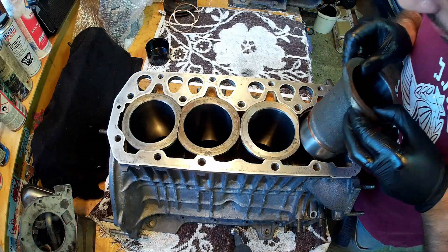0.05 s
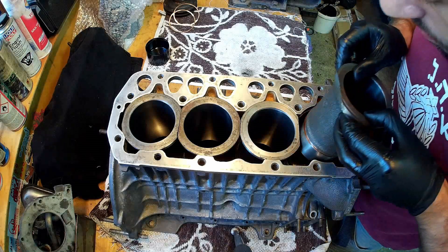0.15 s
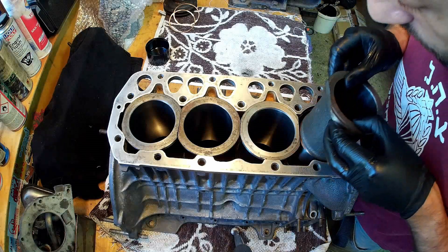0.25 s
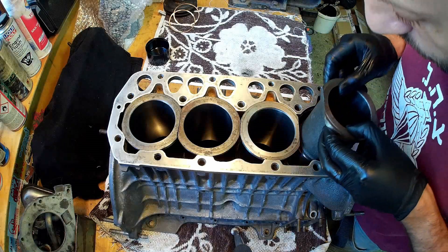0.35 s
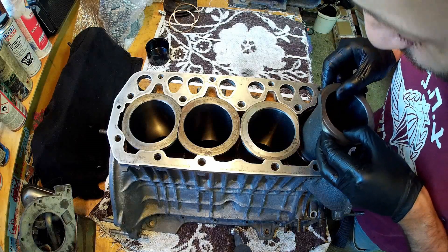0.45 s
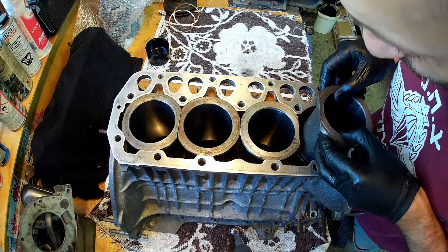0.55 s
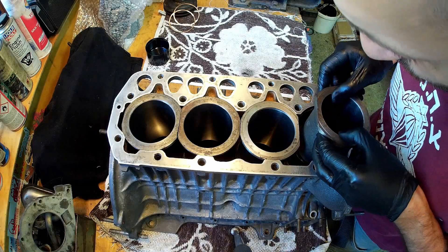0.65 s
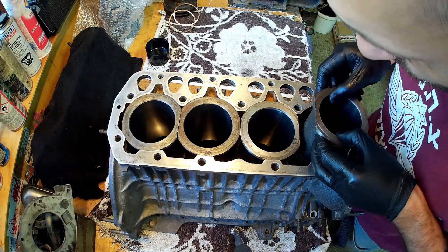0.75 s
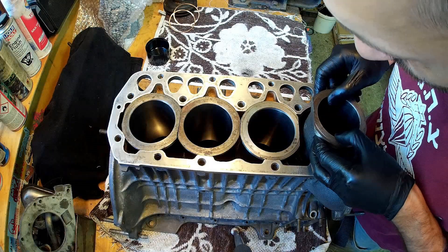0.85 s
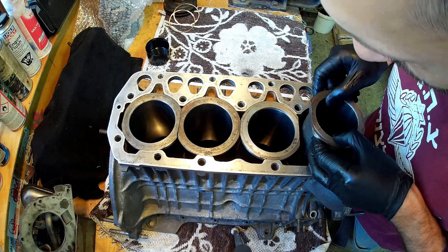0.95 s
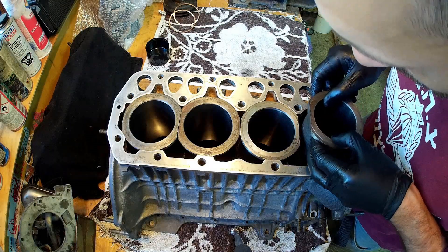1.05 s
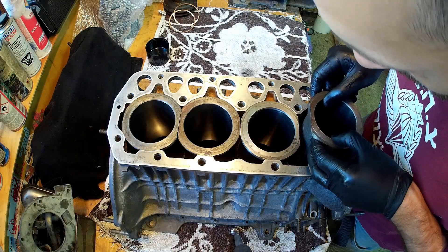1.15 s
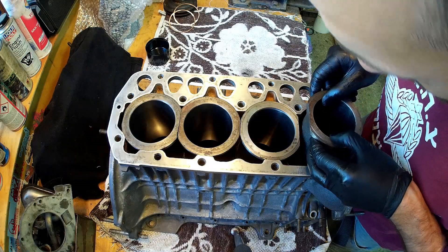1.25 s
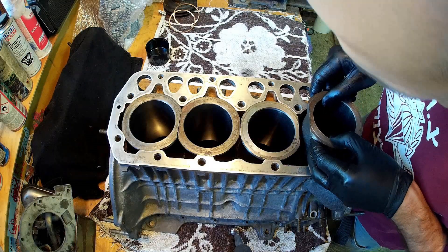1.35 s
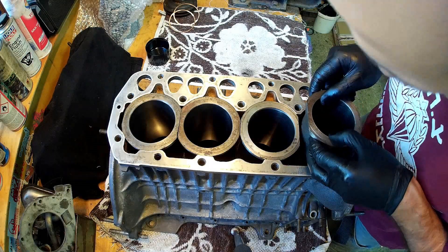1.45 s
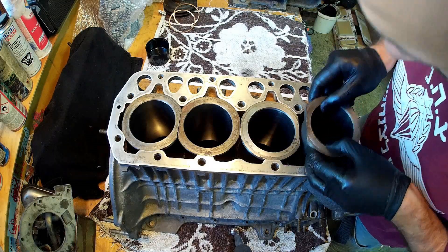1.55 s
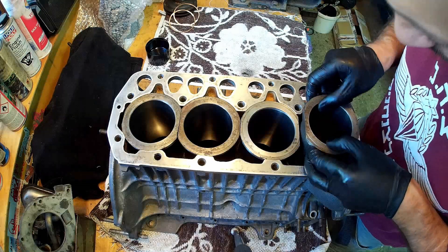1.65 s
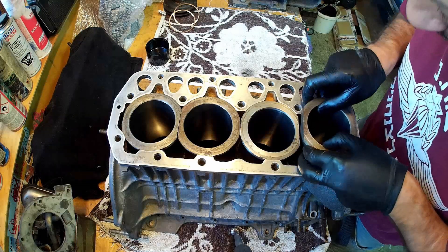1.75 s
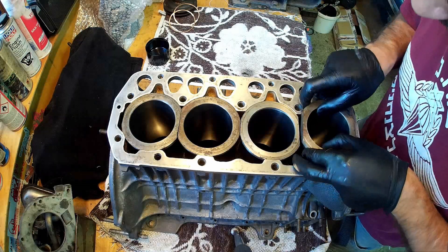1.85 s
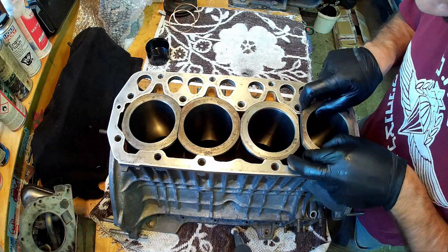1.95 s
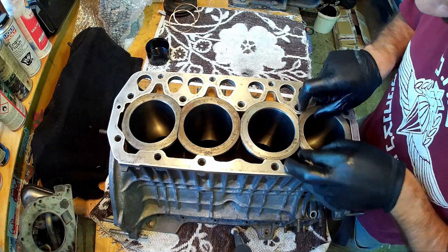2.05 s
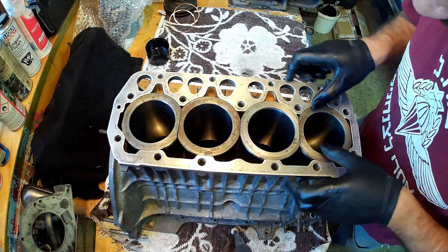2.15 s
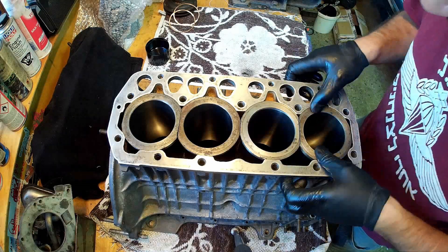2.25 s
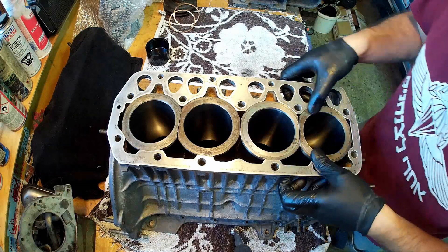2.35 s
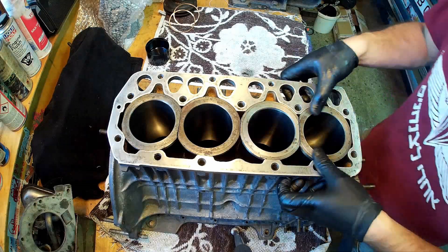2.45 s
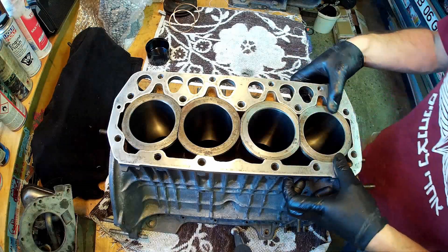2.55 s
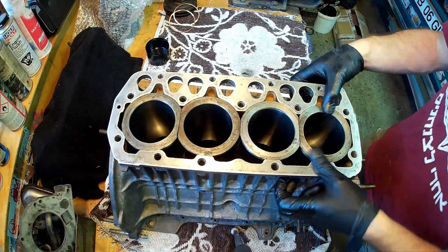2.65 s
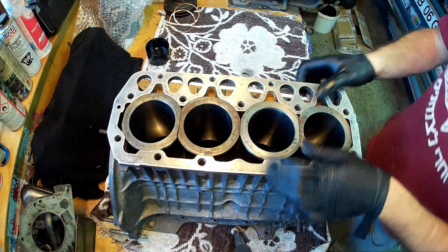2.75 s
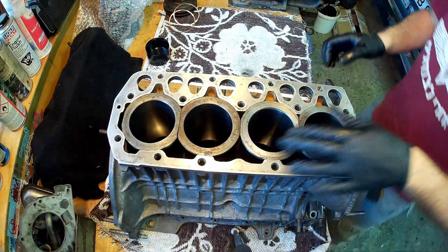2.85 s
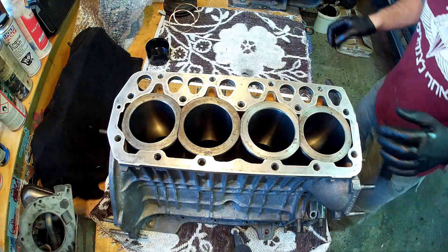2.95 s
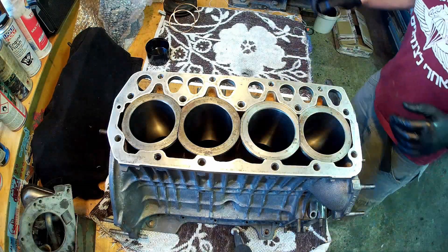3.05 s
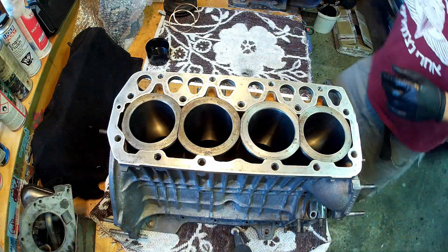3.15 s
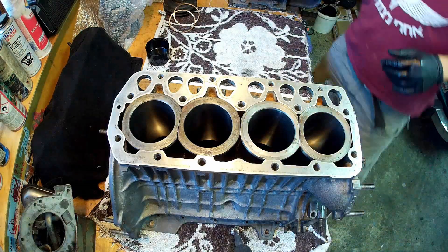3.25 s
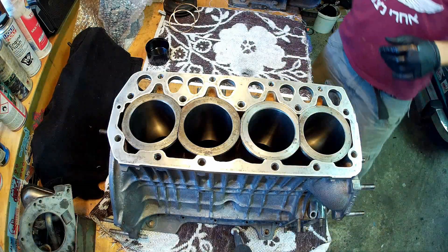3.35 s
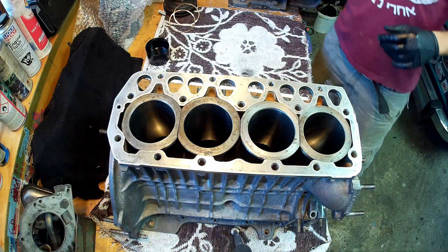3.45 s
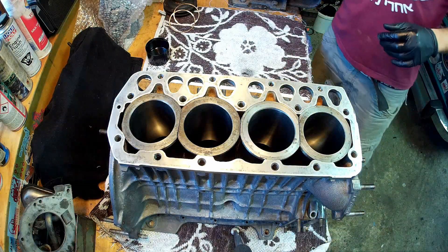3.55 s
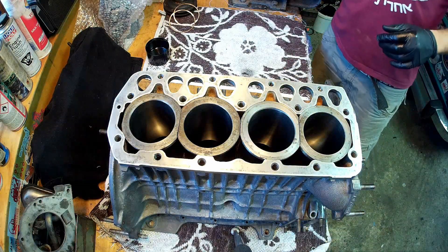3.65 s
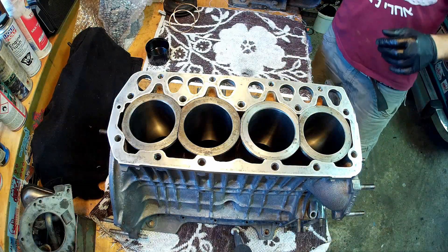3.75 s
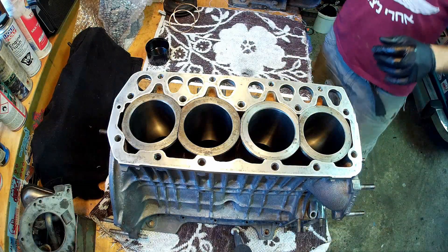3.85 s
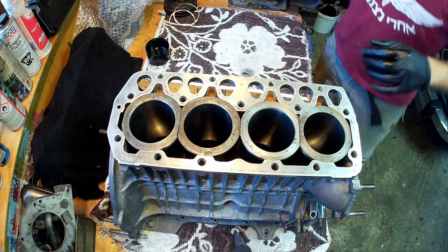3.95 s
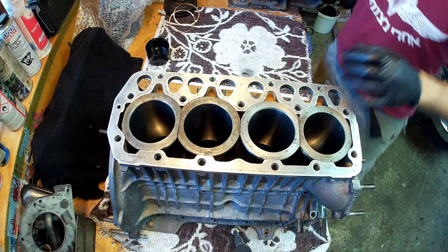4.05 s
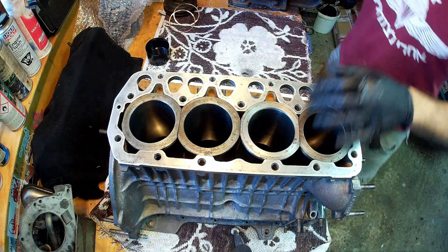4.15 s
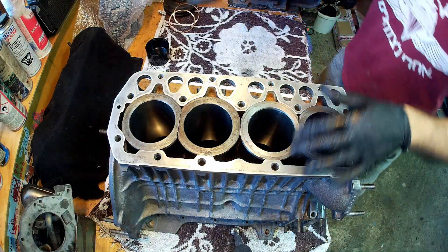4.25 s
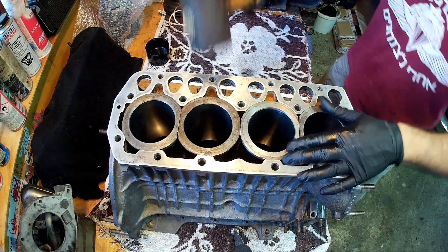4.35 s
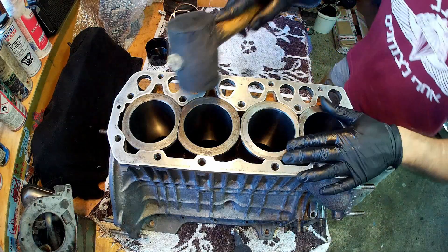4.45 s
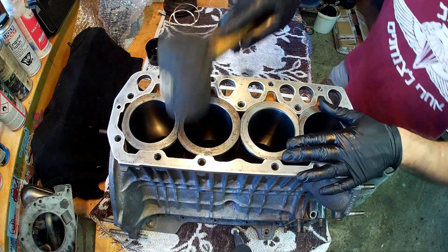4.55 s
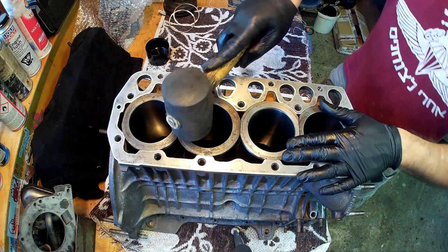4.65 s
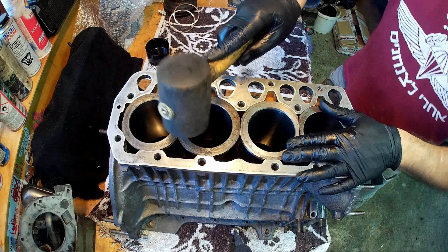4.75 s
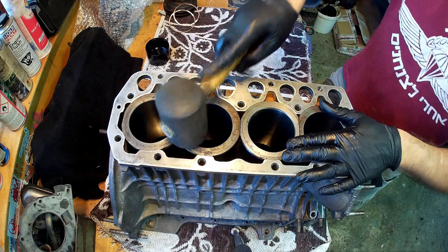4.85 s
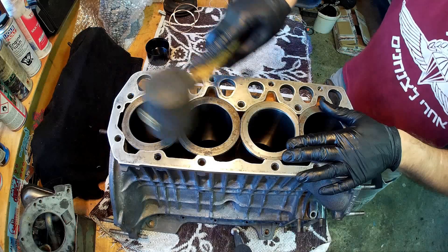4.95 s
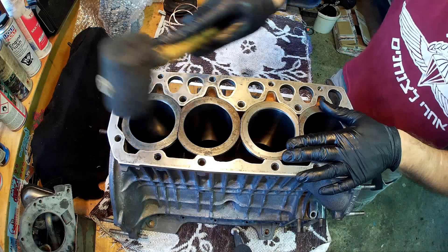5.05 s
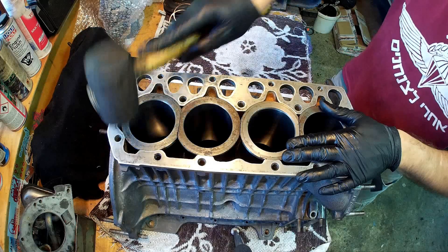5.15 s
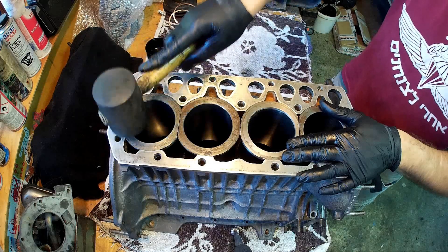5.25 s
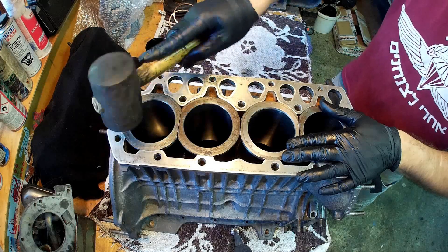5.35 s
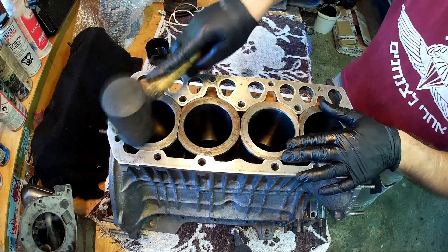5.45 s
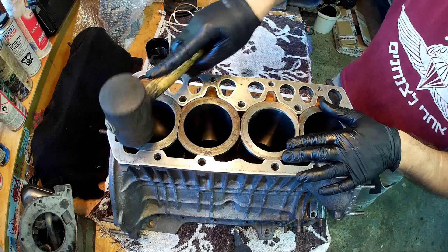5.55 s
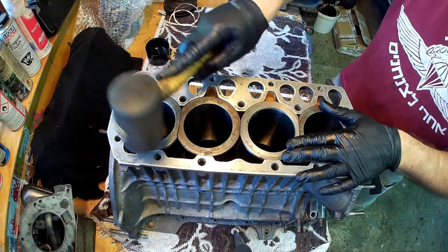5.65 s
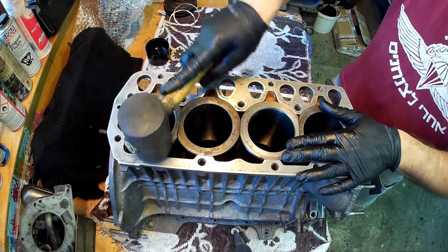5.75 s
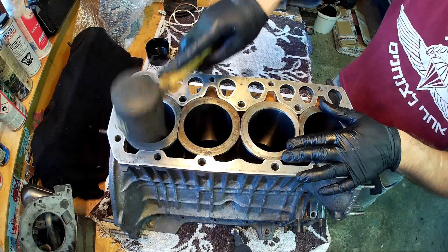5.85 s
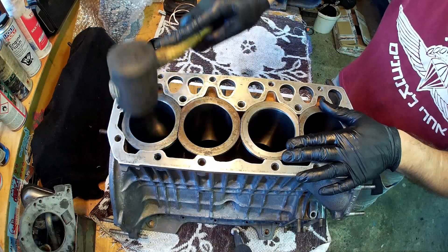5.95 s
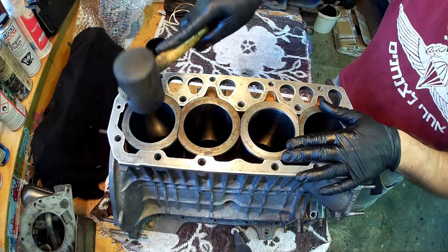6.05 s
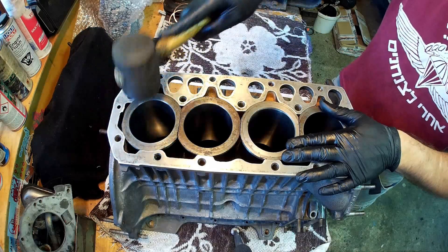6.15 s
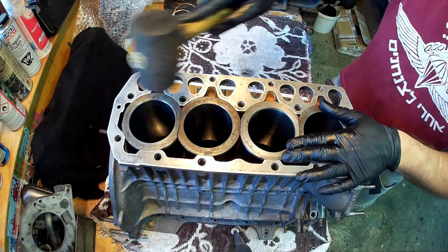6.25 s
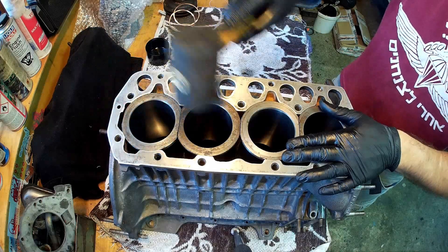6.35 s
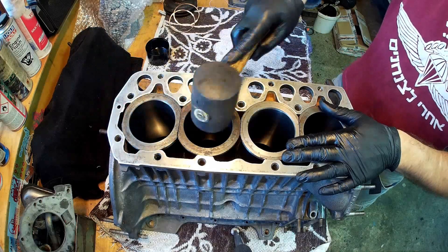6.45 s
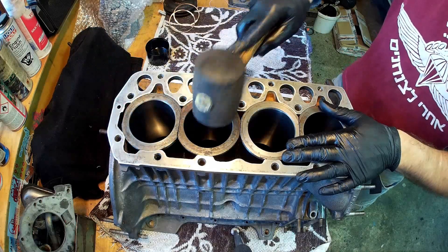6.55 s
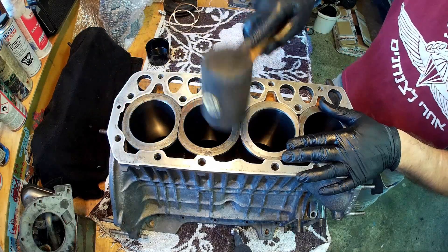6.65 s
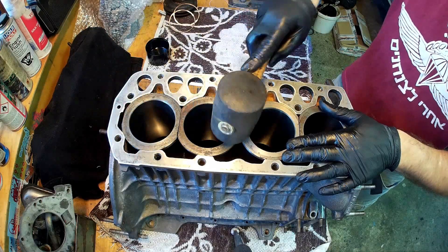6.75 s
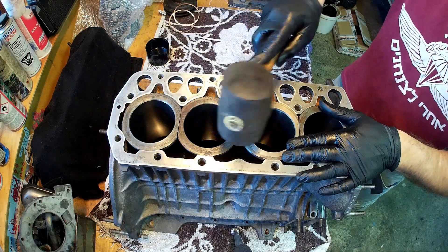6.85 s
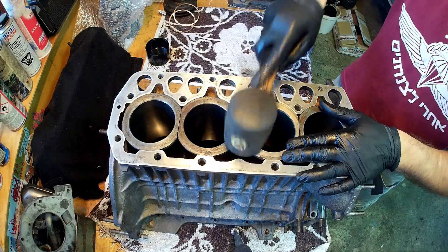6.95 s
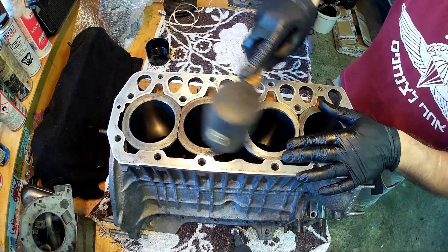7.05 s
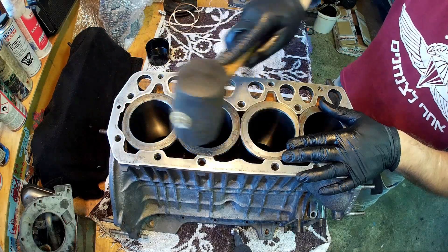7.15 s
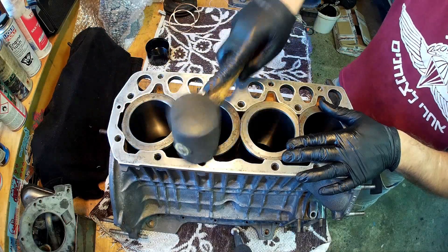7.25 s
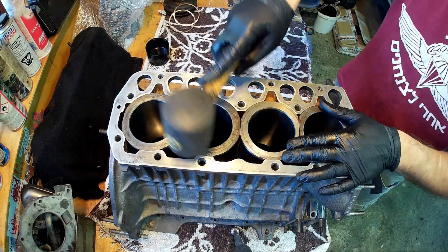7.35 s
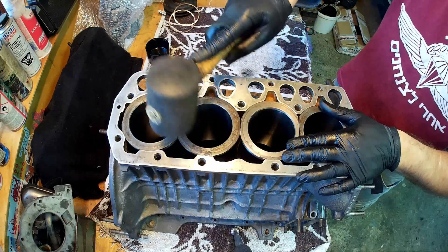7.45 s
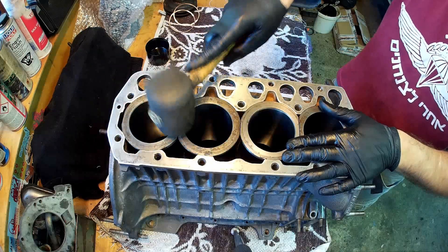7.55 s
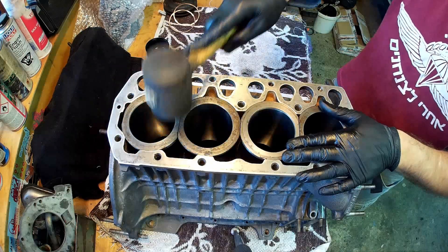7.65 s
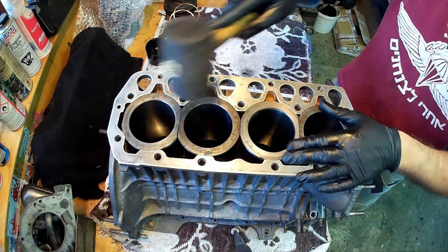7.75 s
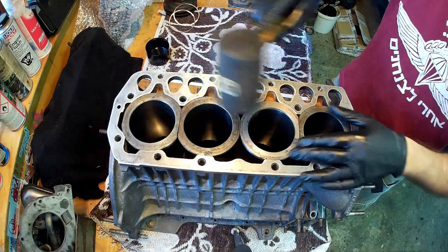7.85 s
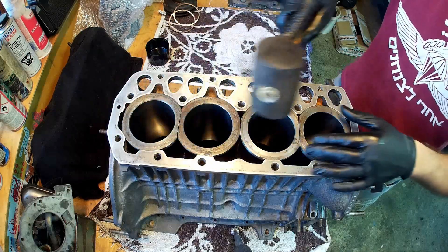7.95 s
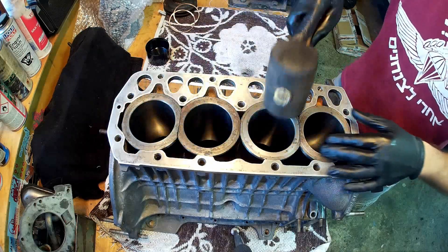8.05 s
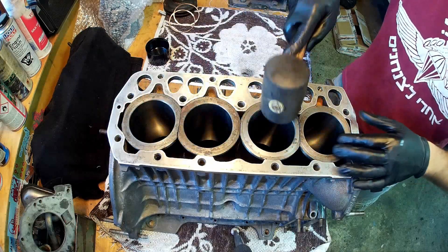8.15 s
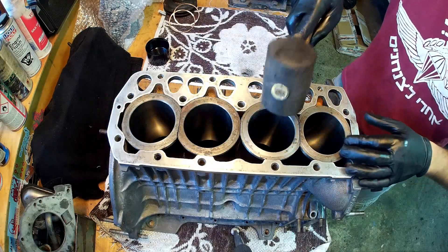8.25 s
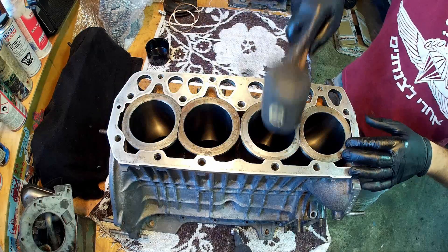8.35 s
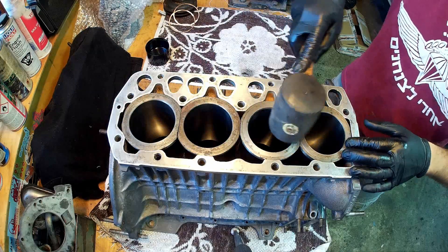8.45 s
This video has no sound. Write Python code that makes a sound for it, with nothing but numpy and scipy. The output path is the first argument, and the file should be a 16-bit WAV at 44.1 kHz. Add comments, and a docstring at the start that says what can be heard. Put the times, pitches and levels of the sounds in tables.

```python
"""Seating steel cylinder liners

On a workshop bench a liner sings, clinks and scrapes into an engine block, driven by friction and contact.
Shoes scuff, then a rubber mallet excites damped modes: the bench thuds, the block knocks, the liners
clank and a loose one hops. A close wall and a small room reflect the sound over a soft rumble and hiss."""
import sys
import numpy as np
from scipy import signal
from scipy.fft import rfft, irfft, next_fast_len
from scipy.io import wavfile
from scipy.ndimage import map_coordinates

SR = 44100
rng = np.random.default_rng(int(sys.argv[2]) if len(sys.argv) > 2 else 0)


def generate_wav(signal):
    """Clip the signal to [-1, 1] and save it as 16-bit WAV at the path in sys.argv[1]."""
    frames = np.transpose(np.atleast_2d(signal))
    scaled = np.clip(frames, -1, 1) * 32767
    pcm = np.round(scaled).astype(np.int16)
    wavfile.write(sys.argv[1], SR, pcm)


N = 375327
T = np.arange(SR * 3 // 5) / SR  # time within one event [s]

# envelope of the liner singing on the rim: (time [s], level [dB])
SINGING = [(0.1, -87), (0.19, -93), (0.21, -77), (0.506, -79), (0.624, -97), (0.672, -76), (0.838, -92),
           (0.852, -69), (1.12, -96)]
# the liner touching the rim: (time [s], level [dB], centre frequency [Hz])
CLINKS = [(.212, -43.5, 3320), (.33, -44, 3580), (.394, -57, 4800), (.462, -45.5, 4800),
          (1.147, -36.5, 2170)]
# the liner knocking in its bore: (time [s], bench thud [dB], clank [dB], clank centre [Hz])
KNOCKS = [(0.4628, -43, -37.5, 910), (0.86, -45, -48, 900), (1.148, -47.5, -65, 2300),
          (1.567, -44.5, -61, 900), (1.678, -44.5, -33.5, 1820), (2.1535, -32, -17, 950),
          (2.1732, -29, -18.5, 290)]
# a glove juddering on the liner: (time [s], rise [s], t60 [s], level [dB], starting pitch [Hz])
RUBS = [(0.661, 0.016, 0.22, -39.5, 406)]
# the liner rubbing down its bore: (time [s], length [s], level [dB])
SCRAPES = [(1.644, 0.043, -57), (1.814, 0.09, -52.5), (1.893, .05, -59), (1.983, 0.059, -58.5),
           (2.06, 0.084, -55), (2.134, 0.068, -41)]
# dry ticks of handling: (time [s], level [dB])
TICKS = [(2.895, -64), (2.916, -55.5), (2.978, -58)]
# shoes and clothes scuffing, and a shoe set down: (time [s], rise [s], t60 [s], level [dB])
SCUFFS = [(3.21, 0.026, .14, -55), (3.412, .012, 0.4, -48), (3.479, .025, .21, -56.5),
          (4.10, 0.055, 0.9, -61.5), (4.223, 0.0026, 0.47, -45)]
STEPS = [(3.662, 0.0038, 0.07, -39.5)]
# mallet blows: (time [s], force [dB], clank [dB], clank centre [Hz], contact crack [dB])
BLOWS = [(4.6488, -18.5, -6, 1046, -18.5), (4.892, -14, -12, 940, -21), (5.2318, -13.5, -13, 832, -18),
         (5.4823, -17, -24, 920, -25), (5.7455, -14, -22, 800, -20.5), (6.0787, -18, -23.5, 890, -21),
         (6.4538, -21.5, -21, 1250, -20), (6.7339, -14.5, -7.5, 1480, -14.5),
         (6.9931, -16.5, -26, 850, -23.5), (7.2839, -14, -24.5, 810, -23), (7.5745, -13.5, -36, 970, -15.5),
         (8.1423, -23, -30, 980, -26), (8.4038, -23.5, -28.5, 1190, -24.5)]
# a loose liner landing after a blow: (time [s], level [dB])
HOPS = [(5.2998, -23), (5.5529, -27), (5.8138, -29.5), (7.352, -32)]

# normal modes of each body: (frequency [Hz], level [dB], t60 [s])
FREE_LINER_MODES = [(1900, -0.5, 0.072), (2400, -15, 0.047), (2790, -12, 0.075), (2930, -23, .05),
                    (4870, -10.5, 0.082)]
BENCH_MODES = [(58.4, -15.5, 0.41), (84.8, -26.5, 0.9), (95.8, -10, 0.32), (124.9, -9, 0.4),
               (151.9, -6, 0.13), (155.8, 3.5, 0.099), (176.8, -5, 0.11), (195, -1.5, 0.02),
               (270.3, -9.5, 0.26), (312, 1.5, 0.016), (402, 7.5, 0.024)]
BLOCK_MODES = [(439, -27, 0.19), (454.6, -11, 0.025), (507, -3.5, 0.049), (603, 4.5, 0.026),
               (657, -25, 0.21), (655.4, 0, 0.021), (740, -23, 0.17)]
SEATED_LINER_MODES = [(838, -11, .06), (885, -8, .07), (965, -8, .06), (1050, -8, .07), (1180, -9, .04),
                      (1267, -3, .08), (1375, -8, .1), (1502, -10, .09), (1598, -7, .09), (1762, -16, .08),
                      (2130, -16, .04), (2326, -9, .05), (2440, -11, .05), (2700, -13, .04),
                      (2832, -6, .07), (3050, -11, .04), (3330, -13, .04), (4064, -23, .06),
                      (4420, -23, .05), (4788, -17, .06), (4990, -19, .05)]
FLANGE_MODES = [(913, 11, 0.015), (992, 8, 0.012), (1080, -38, 0.037), (1340, -19, .03),
                (1390, -11.5, 0.016), (2450, 1.5, 0.0088), (2530, 3.5, 0.013), (2870, 8.5, 0.012),
                (4330, -10, 0.012), (4770, -34, 0.013)]

# spectra of the background and friction noises: (frequency [Hz], level [dB])
AIR_SPECTRUM = [(20, 9), (55, -2), (120, 1), (240, -1.5), (330, -3.5), (450, -7.5), (750, -15.5),
                (1540, -29.5), (2900, -35.5), (6000, -40.5), (11000, -43), (15500, -47.5)]
SING_SPECTRUM = [(1500, -60), (1840, -31), (1875, -1), (1910, 9), (1950, -32), (2300, -60)]
SHUDDER_SPECTRUM = [(25, -6.5), (50, 4), (70, -8), (160, -10), (300, -47), (1000, -83)]
SCRAPE_SPECTRUM = [(300, -1), (1150, 3), (1280, 16.5), (1420, -4), (1570, 6), (1800, -10), (2550, -6),
                   (2760, 7.5), (3150, -21), (5000, -19), (9000, -32)]
SCUFF_SPECTRUM = [(150, -26), (500, 8), (800, 10.5), (1500, 8.5), (2800, 3.5), (3800, -6.5), (5200, -4.5),
                  (7000, -27), (15000, -34)]
# spectra of the impacts and of the liners' dense weak modes: (frequency [Hz], level [dB])
CRACK_SPECTRUM = [(200, 5.5), (450, 13.5), (800, 7), (1500, 6.5), (2300, 4.5), (3200, 0), (3800, -15.5),
                  (5100, -11), (6400, -29), (10000, -33.5), (16000, -46)]
TICK_SPECTRUM = [(300, -14), (1000, -16), (3500, -17), (4900, 0), (6000, -11), (9000, -25)]
STEP_SPECTRUM = [(80, -7), (200, 7.5), (350, 5.5), (520, 4.5), (780, -2.5), (1050, -31), (2200, -23),
                 (6000, -48)]
HOP_SPECTRUM = [(400, -4), (1000, 11), (1800, -6.5), (2600, 4), (3700, -28), (4600, -13.5), (5800, -40),
                (12000, -38)]
WASH_SPECTRUM = [(350, -9.5), (800, -1.5), (1300, -1), (1620, -5), (1850, -11.5), (2400, -4), (3250, -8.5),
                 (3750, -26), (5000, -20), (6500, -40.5), (15000, -44)]

# early reflections: (delay [s], gain [ratio])
WALLS = [(.00435, 0.26), (0.0113, 0.12), (0.0132, .19)]
# reverberation time: (frequency [Hz], t60 [s])
ROOM_T60 = [(100, 0.57), (300, 0.31), (700, 0.3), (1500, 0.28), (3000, 0.27), (10000, 0.24)]
# colour of the reverberation: (frequency [Hz], level [dB])
ROOM_LEVEL = [(60, -29), (150, -6), (350, -9), (700, -8), (1100, -5.5), (2500, -11), (8000, -5)]


def amp(db):
    """Amplitude grows tenfold every 20 dB."""
    return 10 ** (np.asarray(db) / 20)


def unit(x):
    """Normalisation to rms 1."""
    return x / np.sqrt(np.mean(x ** 2) + 1e-20)


def along(points, hz):
    """Interpolation on a logarithmic frequency axis."""
    frequencies, values = np.transpose(points)
    return np.interp(np.log(hz + 1), np.log(frequencies + 1), values)


def filtered(x, response):
    """Linear filtering multiplies the spectrum by a frequency response."""
    size = next_fast_len(len(x) + 8192)
    return irfft(rfft(x, size) * response(np.fft.rfftfreq(size, 1 / SR)), size)[:len(x)]


def noise(spectrum, size):
    """Spectral shaping turns white noise into coloured noise of rms 1."""
    return unit(filtered(rng.standard_normal(size), lambda hz: amp(along(spectrum, hz))))


def add(track, s, sound):
    """Superposition: a sound joins the track at time s."""
    part = track[round(s * SR):][:len(sound)]
    part += sound[:len(part)]


def onset(rise):
    """Vibration builds smoothly from rest, with a time constant in seconds."""
    return -np.expm1(-(T / rise) ** 2)


def swell(rise, t60, db):
    """Linear growth, then exponential decay by 60 dB in t60."""
    return np.minimum(T / rise, 1) * amp(db - 60 * np.maximum(T - rise, 0) / t60)


def room(sound, wet_db=0):
    """Convolution adds early reflections and a diffuse tail whose treble is absorbed first."""
    hz, t, spectra = signal.stft(rng.standard_normal(len(T)), SR, nperseg=512)
    t60 = along(ROOM_T60, hz)[:, None]
    decay = amp(wet_db + along(ROOM_LEVEL, hz)[:, None] - 60 * t / t60)
    energy_norm = np.sqrt(2 * np.log(1000) / (t60 * SR))
    response = signal.istft(spectra * decay * energy_norm, SR, nperseg=512)[1][:len(T)] * onset(0.0072)
    response[0] += 1  # direct sound
    for delay, gain in WALLS:
        response[round(delay * SR)] += gain
    return signal.fftconvolve(sound, response)[:len(T)]


def background(rumble_db=-57, hiss_db=-64.5, step_s=3.28, ramp_s=0.14, step_db=3):
    """Ambient noise in two complementary bands, rumble and hiss; both step up once."""
    lift_db = step_db * np.clip((np.arange(N) / SR - step_s) / ramp_s, 0, 1)
    low_share = lambda hz: 1 / (1 + (hz / 1100) ** 4)
    rumble = unit(filtered(noise(AIR_SPECTRUM, N), lambda hz: np.sqrt(low_share(hz))))
    hiss = unit(filtered(noise(AIR_SPECTRUM, N), lambda hz: np.sqrt(1 - low_share(hz))))
    return amp(rumble_db + lift_db) * rumble + amp(hiss_db + lift_db) * hiss


def singing():
    """Resonance: friction on the rim sustains the liner's lowest free mode."""
    s, db = np.transpose(SINGING)
    return np.interp(np.arange(N) / SR, s, amp(db), left=0, right=0) * noise(SING_SPECTRUM, N)


def metal(modes, centre_hz, slope_db):
    """Modal excitation: the contact point favours modes near centre_hz, losing slope_db per octave."""
    hz, db, t60 = np.transpose(modes)[:, :, None]
    db = db - slope_db * np.abs(np.log2(hz / centre_hz)) + rng.standard_normal(hz.shape)
    phase = rng.uniform(0, 2 * np.pi, hz.shape)
    partials = amp(db - 60 * T / t60) * np.sin(2 * np.pi * hz * T + phase)
    return np.sum(partials, axis=0) * onset(0.0027)


def pulse(spectrum):
    """Minimum phase packs a spectrum into one causal click of peak 1."""
    magnitude = amp(along(spectrum, np.fft.rfftfreq(len(T), 1 / SR)))
    cepstrum = irfft(np.log(magnitude), len(T))
    cepstrum[1:len(T) // 2] *= 2
    cepstrum[len(T) // 2:] = 0
    click = irfft(np.exp(rfft(cepstrum)), len(T))
    return click / np.max(np.abs(click))


def crack(spectrum, t60):
    """An impact transient: a click, then dense metal modes that die at once."""
    dense_modes = amp(-60 * T / t60) * noise(spectrum, len(T)) * onset(0.00021)
    return 1.28 * pulse(spectrum) + 0.65 * dense_modes


def taps(rows, modes, slope_db, crack_db, wet_db):
    """Light impacts excite the modes of one liner and leave the block still."""
    track = np.zeros(N)
    for s, db, centre_hz in rows:
        tap = metal(modes, centre_hz, slope_db) + amp(crack_db) * crack(CRACK_SPECTRUM, t60=0.005)
        add(track, s, room(amp(db) * tap, wet_db))
    return track


def rim_clinks():
    """Free vibration: the liner rings after each touch on the rim."""
    return taps(CLINKS, FREE_LINER_MODES, slope_db=21, crack_db=-8, wet_db=-19)


def body_ring(modes, damping):
    """Damped low modes take part of a cycle to start and displace no net air."""
    hz, db, t60 = np.transpose(modes)[:, :, None]
    scatter_db = rng.standard_normal(hz.shape) / 2
    envelope = amp(db + scatter_db - 60 * T * damping / t60) * onset(0.58 / hz)
    sound = np.sum(envelope * np.cos(2 * np.pi * hz * T), axis=0)
    return signal.sosfilt(signal.butter(2, 55, "high", fs=SR, output="sos"), sound)


def clank(centre_hz, damping):
    """Modal overlap: under the liners' strong modes, weak ones merge and chatter in the bores."""
    modes = np.array(SEATED_LINER_MODES, float)
    modes[:, 0] *= 1 + .003 * rng.standard_normal(len(modes))  # slight detuning
    colour = [(hz, db - 12 * abs(np.log2(hz / centre_hz))) for hz, db in WASH_SPECTRUM]
    chatter = amp(1.5 * map_coordinates(rng.standard_normal(256), [T * 200], mode="wrap"))
    wash = noise(colour, len(T)) * chatter * swell(rise=0.0042, t60=0.058, db=-9)
    grip = amp(-60 * T * (damping - 1) / 0.058)
    return grip * (amp(-8.5) * metal(modes, centre_hz, slope_db=10.5) + wash)


def strikes(rows, damping, crack_t60, wet_db):
    """Impulse response: one contact cracks and rings bench, block and liners; damping hastens decay."""
    track = np.zeros(N)
    for s, thud_db, knock_db, clank_db, centre_hz, crack_db in rows:
        bench = amp(thud_db) * body_ring(BENCH_MODES, damping)
        block = amp(knock_db) * body_ring(BLOCK_MODES, damping)
        liners = amp(clank_db) * clank(centre_hz, damping)
        contact = amp(crack_db) * crack(CRACK_SPECTRUM, crack_t60)
        add(track, s, room(bench + block + liners + contact, wet_db))
    return track


def bore_knocks(block_offset_db=-10.5, crack_offset_db=-12.5):
    """Added damping: gripping hands shorten every ring as the liner knocks its way in."""
    rows = []
    for s, thud_db, clank_db, centre_hz in KNOCKS:
        knock_db = (thud_db + clank_db) / 2 + block_offset_db
        rows.append((s, thud_db, knock_db, clank_db, centre_hz, clank_db + crack_offset_db))
    return strikes(rows, damping=1.73, crack_t60=0.011, wet_db=-28)


def glove(sag=0.259, sag_s=0.031):
    """Stick-slip oscillation of rubber on steel: a hollow note that sags as the hand slows."""
    track = np.zeros(N)
    for s, rise, t60, db, hz in RUBS:
        pitch = hz * (1 + sag * np.expm1(-T / sag_s))
        judder = np.sin(2 * np.pi * np.cumsum(pitch) / SR) + 0.33 * noise(STEP_SPECTRUM, len(T))
        add(track, s, room(swell(rise, t60, db) * judder))
    return track


def pushing(start_s=1.3, end_s=2.08, rise_s=0.24, t60=0.3, db=-56.5):
    """Forced vibration: the block shudders under the hands and settles as the liner seats."""
    t = np.arange(N) / SR
    growth = np.clip((t - start_s) / rise_s, 0, 1)
    decay = amp(db - 60 * np.maximum(t - end_s, 0) / t60)
    return growth * decay * noise(SHUDDER_SPECTRUM, N)


def strokes(rows, spectrum, slip_hz, rough_db):
    """Amplitude modulation: uneven grip and slip roughen friction noise as it swells and fades."""
    track = np.zeros(N)
    for s, rise, t60, db in rows:
        slips = map_coordinates(rng.standard_normal(1024), [T * slip_hz], mode="wrap")
        grain = unit(noise(spectrum, len(T)) * amp(rough_db * slips))
        add(track, s, room(swell(rise, t60, db) * grain))
    return track


def scraping(rise_share=0.38, t60_share=1.2):
    """Sliding friction: the liner moves down its bore in short strokes of one shape."""
    rows = [(s, rise_share * length, t60_share * length, db) for s, length, db in SCRAPES]
    return strokes(rows, SCRAPE_SPECTRUM, slip_hz=246, rough_db=3)


def ticks():
    """Faint contacts radiate a transient with no ring."""
    track = np.zeros(N)
    for s, db in TICKS:
        add(track, s, room(amp(db) * crack(TICK_SPECTRUM, t60=0.025)))
    return track


def shoes(quick_rise_s=0.007, dulling_db=2.5, treble_hz=3500):
    """Friction noise of one footfall and of scuffs, which are duller the slower they start."""
    track = strokes(STEPS, STEP_SPECTRUM, slip_hz=79, rough_db=3)
    for s, rise, t60, db in SCUFFS:
        loss_db = dulling_db * np.log2(rise / quick_rise_s)
        colour = [(hz, level - loss_db * (hz > treble_hz)) for hz, level in SCUFF_SPECTRUM]
        track += strokes([(s, rise, t60, db)], colour, slip_hz=260, rough_db=2.5)
    return track


def mallet(thud_db=-16.5, thud_growth=0.25):
    """Impact of rubber on steel: the block follows the force of the blow, the heavy bench much less."""
    rows = [(s, thud_db + thud_growth * force_db, force_db, clank_db, centre_hz, crack_db)
            for s, force_db, clank_db, centre_hz, crack_db in BLOWS]
    return strikes(rows, damping=1, crack_t60=0.026, wet_db=-1)


def hops(rock_s=0.0215, flange_hz=1110):
    """Rocking contact: a loose liner touches twice, lands, touches again; each rings its flange."""
    clicks, flange = np.zeros(N), []
    for s, db in HOPS:
        for touch in range(-2, 2):  # touch 0 is the landing, the loudest
            touch_s = s + touch * rock_s
            click_db = db - 4.5 - 14 * (touch != 0)
            ring_db = db - 1.5 - 2.5 * abs(touch)
            add(clicks, touch_s, room(amp(click_db) * crack(HOP_SPECTRUM, t60=.022), wet_db=-21))
            flange.append((touch_s, ring_db, flange_hz))
    return clicks + taps(flange, FLANGE_MODES, slope_db=8.5, crack_db=-31, wet_db=-29)


def scene():
    """Superposition of all sources in one channel."""
    handling = bore_knocks() + rim_clinks() + singing() + glove() + scraping() + pushing() + ticks()
    return (mallet() + hops() + handling + shoes() + background())[None]


def record(dry, low_hz=24, top_hz=15800):
    """Band limiting removes the deepest bass and the highest treble."""
    sound = signal.sosfilt(signal.butter(2, low_hz, "high", fs=SR, output="sos"), dry[0])
    return filtered(sound, lambda hz: hz < top_hz)[None]


dry = scene()
out = record(dry)
generate_wav(out)
```